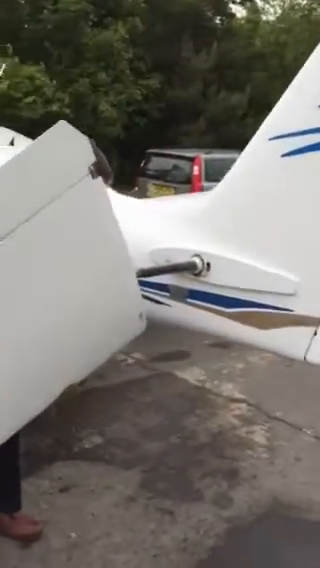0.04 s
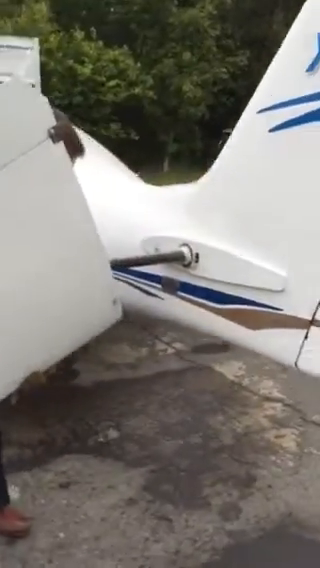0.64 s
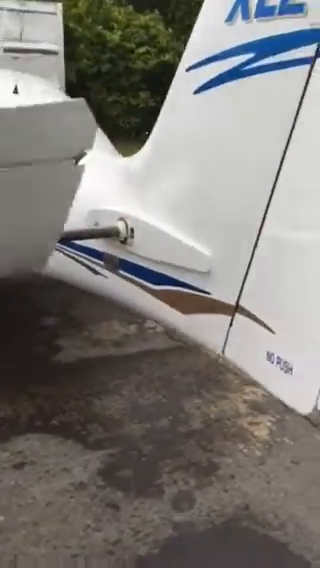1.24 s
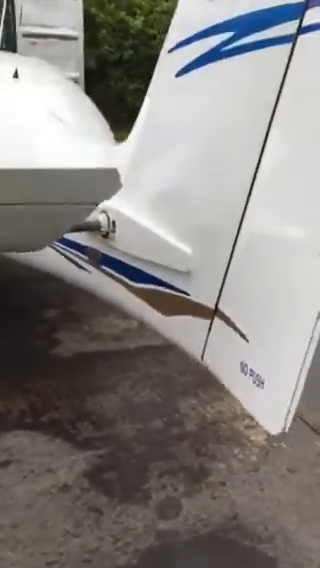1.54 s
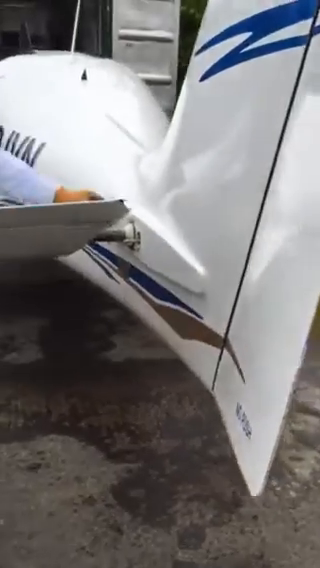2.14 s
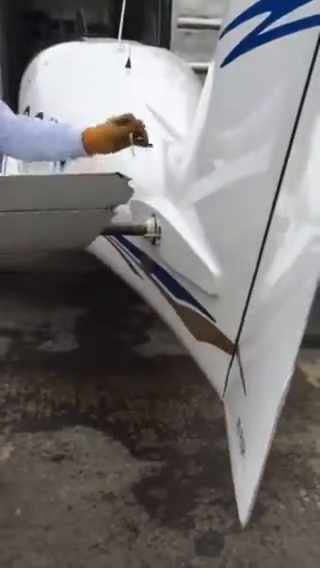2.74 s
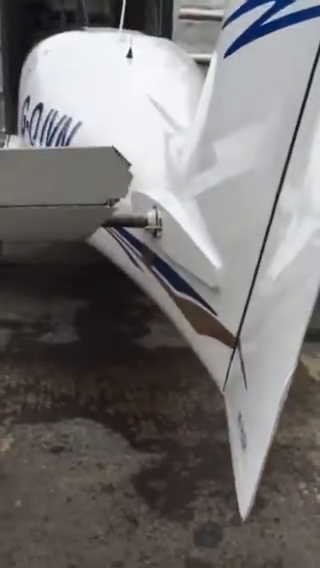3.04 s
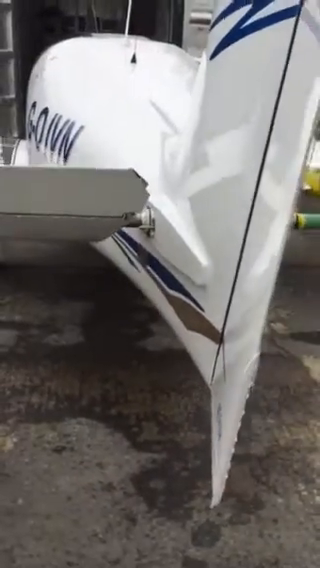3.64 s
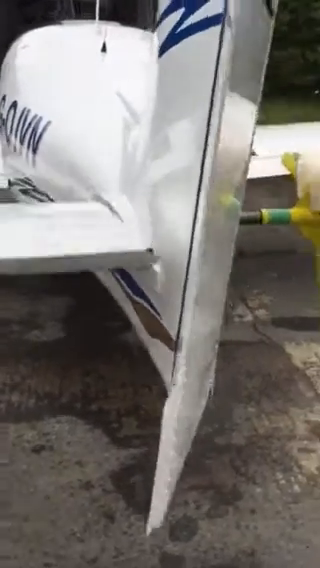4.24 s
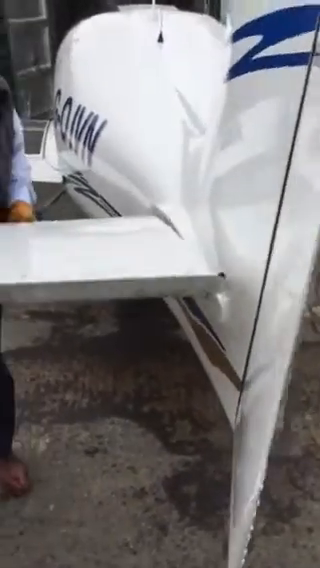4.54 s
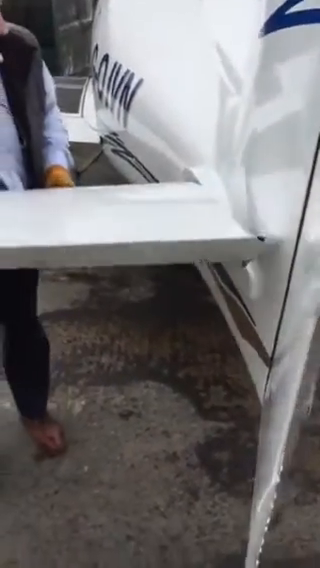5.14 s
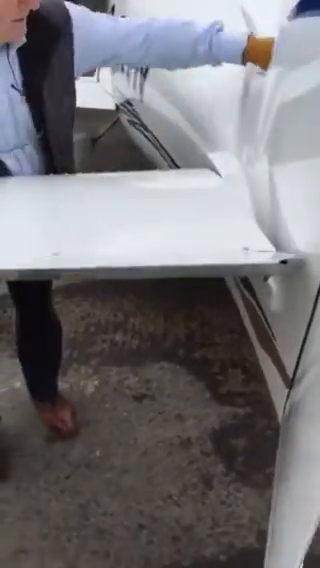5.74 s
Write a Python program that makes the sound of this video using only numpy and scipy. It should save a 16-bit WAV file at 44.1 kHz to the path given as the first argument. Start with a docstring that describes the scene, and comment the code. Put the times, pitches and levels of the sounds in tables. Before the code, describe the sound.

Outdoors, close to the microphone, a folding aircraft wing is handled with an uneven run of hollow knocks and brief clacks from its metal fittings. After the opening knocks, wind thumps softly on the microphone and a latch scrapes and snaps shut. One loud clunk follows about a second and a half later, then smaller knocks as the wing settles. Gloves and shoes scuff quietly throughout over a very still background.

```python
"""A light aircraft's hollow wing is swung back and jostled into place on a quiet, open concrete yard.
Faint squeaks lead into the first blows: the skin knocks, the air inside booms, metal fittings clack.
From 2 s puffs of wind buffet the microphone; a latch slides in jerks and snaps home near 2.7 s.
More wind and knocks lead to the hardest blow near 4.2 s, and a few lighter ones settle the wing.
Gloves and shoes scuff between the blows and on to the end."""
import sys
import numpy as np
from scipy import signal
from scipy.fft import rfft, irfft
from scipy.io import wavfile

SR = 44100
rng = np.random.default_rng(int(sys.argv[2]) if len(sys.argv) > 2 else 0)


def store_wav(level_fs):
    """Save 16-bit WAV to argv[1]."""
    pcm = np.round(np.clip(np.atleast_2d(level_fs), -1, 1) * 32767)
    wavfile.write(sys.argv[1], SR, pcm.T.astype(np.int16))


N = 264546
RING_TIME = np.arange(SR * 3 // 4) / SR  # seconds since a blow
BANDS_HZ = np.geomspace(60, 15000, 9)

# blows on the hollow wing: start_s, force_db, contact_ms, bass_db, boom_db
WING_BLOWS = [ (0.641, -18, .7, -6, 8), (0.739, -15.5, .25, -3, 0), (0.786, -15.5, .39, 1, 2),
              (0.845, -29, .9, 2, 0), (1.130, -20, .28, -3, -1.5), (1.143, -21, .4, 3, -2),
              (1.2185, -16.5, .42, -1, 1), (1.256, -28, .4, -2.5, 8), (1.545, -29, .55, 7, 18),
              (1.745, -30, 4, 0, 4.5), (2.009, -43, .8, -4, -12), (2.022, -28, 2, -9, -12.5),
              (2.620, -25, .28, -27, -32), (2.659, -24, .25, -22, -25), (3.541, -23, .6, -6.5, -8),
              (3.691, -11, .24, -13, -14), (4.094, -31, .13, -6, -8), (4.1575, -14, .25, -7, -10.5),
              (4.1625, -6, .07, -9, -14), (4.171, -.5, .13, 2, -1), (4.193, -14, .17, -1, -8.5),
              (4.641, -31, 1.1, -1, -14), (4.6855, -16.5, 1, -2, -10), (4.818, -17, .52, -15, -18),
              (4.853, -14, .12, -4, -14), (4.864, -15, .2, 0, -10), (5.214, -24, .7, 0, 16),
              (5.2215, -17.5, .29, -3, 0)]
# tone of the skin's dense ring: frequency_hz, level_db
SKIN_SPECTRUM = [(30, -21), (70, -4), (130, -0.5), (300, 0), (550, 0), (900, -3.5), (1500, -6.5),
                 (2800, -12.5), (4500, -19), (6000, -17), (9000, -28), (15000, -31)]
# length of the skin's tail: frequency_hz, t60_s
SKIN_TAIL_T60 = [(60, 1.0857), (300, 0.8), (700, 0.5475), (1500, 0.3418), (4000, 0.1764), (15000, 0.0068)]
# weight of the skin's tail: frequency_hz, level_db
SKIN_TAIL_DB = [(60, -19), (150, -14), (280, -8), (550, -21), (1500, -18.5), (4000, -20), (15000, -21)]
# the wing's strongest modes: pitch_hz, level_db, t60_s
WING_RESONANCES = [(188, -11, .55), (229, -12, .6), (266, -12, .65), (310, -5, .55), (332, -8, .5),
                   (410, -6, .35), (486, -7, .2), (515, -10, .19), (558, -5, .3), (592, -11, .3),
                   (684, 2, .17), (778, -24, .6), (886, -9, .14), (950, -3, .12), (1030, -5, .14),
                   (1150, -8, .13), (1410, -10, .13), (1680, -6, .1), (1997, -8, .1), (2648, -8, .09),
                   (2861, -10, .09), (4384, -14, .08), (5864, -10, .07)]
# metal fittings striking: start_s, force_db, pitch_hz
FITTING_HITS = [(0.740, -34, 7000), (1.143, -28, 13500), (1.162, -24, 14000), (1.171, -17, 3300),
                (2.393, -57, 11700), (2.476, -55, 8500), (2.621, -44, 11500), (2.660, -42, 11500),
                (2.715, -17, 2300), (2.7345, -3.5, 2500), (2.739, -6.5, 1650), (3.196, -44, 5000),
                (3.692, -21, 1450), (3.909, -43, 4500), (4.163, -10, 5000), (4.171, -5, 2800),
                (4.197, -18, 3000), (4.818, -44, 13000), (4.848, -24, 6500), (4.853, -17, 5600),
                (4.8545, -14, 3900), (5.226, -23, 1700)]
# tone of the fittings' dense ring: frequency_hz, level_db
FITTING_SPECTRUM = [(100, -48), (400, -20), (800, -8.5), (1200, -2), (1700, -1), (2800, -5), (4800, -14),
                    (7200, -15), (10000, -21), (15000, -24)]
# the fittings' strongest modes: pitch_hz, level_db, t60_s
FITTING_RESONANCES = [(1125, -3, .12), (1357, -4, .13), (1518, -7, .16), (1640, -4, .13), (1782, -10, .17),
                      (2860, -10, .13), (4400, -14, .1), (5900, -12, .09), (7220, -14, .08),
                      (8100, -18, .1)]
# jerks of the sliding latch: start_s, level_db
LATCH_SLIDES = [(2.619, -32.5), (2.658, -30), (2.711, -29)]
# the latch's body: pitch_hz, width_hz, level_db
LATCH_RESONANCES = [(480, 120, -7), (689, 50, -1), (807, 70, 0), (937, 70, -1), (1770, 130, -8),
                    (2730, 200, -18), (3340, 200, -18), (5700, 500, -31)]
# gloves and shoes scuffing: middle_s, level_db, half_length_s, tilt_db_per_octave
HANDLING_SCUFFS = [(0.28, -64, .05, -1), (1.08, -49, .06, -4.5), (1.40, -53.5, .04, -2),
                   (1.49, -51, .025, -1.5), (1.565, -47, .03, -1), (1.88, -54, .06, -10),
                   (2.04, -60, .06, 1), (3.12, -59.5, .11, -.5), (3.435, -50, .015, -3),
                   (3.51, -47, .035, -1.5), (3.67, -46, .015, -8), (3.82, -52.5, .06, -1.5),
                   (3.905, -43, .014, 1.5), (4.0, -50, .07, -2), (4.13, -48, .03, 0.5), (4.28, -51, .03, 1),
                   (4.66, -45, .02, -7), (4.78, -55, .04, -5), (5.195, -44.5, .025, -1),
                   (5.48, -55, .03, -5), (5.80, -65, .06, -0.5), (5.915, -49, .028, 1)]
# tone of a scuff before its tilt: frequency_hz, level_db
SCUFF_SPECTRUM = [(100, -13.5), (400, 0), (1400, 1), (3000, -7), (6000, -12.5), (10000, -19),
                  (15000, -21)]
# squeaks of rubbing parts: middle_s, level_db, half_length_s, pitch_hz
RUB_SQUEAKS = [(0.21, -71, .03, 1570), (0.27, -60, .013, 1580), (0.318, -59, .013, 1590),
               (2.729, -24, .005, 1700), (4.652, -66, .008, 5600), (5.26, -65, .005, 11700)]
# wind eddies at the microphone: middle_s, level_db, half_length_s, pitch_hz
WIND_PUFFS = [(2.085, -29, .02, 90), (2.145, -26, .028, 95), (2.195, -28.5, .018, 100),
              (2.247, -23.5, .022, 100), (2.318, -31.5, .014, 100), (2.388, -32.5, .01, 90),
              (2.46, -36.5, .025, 80), (2.79, -33, .022, 95), (3.293, -19, .008, 85),
              (3.43, -35, .025, 100), (3.592, -21, .02, 100), (3.63, -23, .02, 110),
              (3.77, -27.5, .022, 150), (3.832, -20, .012, 130), (3.972, -25.5, .012, 175),
              (5.39, -35, .014, 105), (5.472, -39.5, .01, 100), (5.555, -36.5, .014, 85)]
# tone of an eddy's flutter: frequency_hz, level_db
FLUTTER_SPECTRUM = [(20, -7.5), (60, -4.5), (250, -1), (500, -15), (1000, -44), (3000, -77)]
# gusts of breeze: start_s, length_s, relative_level_db
BREEZE_GUSTS = [(0.63, .7, -49), (1.7, .16, -41), (2.03, .39, -40), (2.77, .22, -42), (3.3, 2.28, -45.5),
                (3.55, .3, -35.5), (5.71, .29, -48.5)]
# tone of the breeze's rumble: frequency_hz, level_db
BREEZE_SPECTRUM = [(15, -31), (35, -14), (65, 0.5), (110, -2.5), (180, -9.5), (350, -26.5),
                   (900, -51.5), (3000, -76.5)]
# tone of the outdoor bed: frequency_hz, level_db
YARD_SPECTRUM = [(25, -25), (60, -5), (120, -11), (250, -15), (500, -12), (1000, -15), (1500, -15),
                 (3000, -19.5), (7000, -27), (15000, -33)]


def wing_knocks(skin_db=5.5, modes_db=-17, cavity_db=-5, boom_hz=172, bass_hz=280, medium_force_db=-18):
    """Each blow shakes the skin, which rings on faintly, and pumps the air in the hollow wing."""
    out, bands = np.zeros(N), dense_modes()
    mode_hz, modes = ring(WING_RESONANCES)
    attack = decay(t60_s=.1 * (BANDS_HZ / 1000) ** -.33)  # high modes die sooner
    tail = amp(curve(SKIN_TAIL_DB, BANDS_HZ))[:, None] * decay(curve(SKIN_TAIL_T60, BANDS_HZ))
    spreading = 1 - np.exp(-RING_TIME / .001)  # bending waves need a moment to cross the panel
    boom_swell = decay(t60_s=.13) * (1 - np.exp(-RING_TIME / .006))
    for start_s, force_db, contact_ms, bass_db, boom_db in WING_BLOWS:
        def contact_db(hz):
            """A long, soft contact cannot excite the high modes; a shelf sets the low-end weight."""
            treble_loss_db = 10 * np.log10(1 + (hz * contact_ms / 1000) ** 5)
            return bass_db / (1 + (hz / bass_hz) ** 4) - treble_loss_db

        tail_db = 1 - .35 * (force_db - medium_force_db)  # a hard blow is damped sooner
        skin = strike(bands, attack + amp(tail_db) * tail)
        skin = colour(skin, lambda hz: skin_db + curve(SKIN_SPECTRUM, hz) + contact_db(hz))
        skin += (amp(modes_db + contact_db(mode_hz)) * strike_spot(len(modes))) @ modes
        pitch_hz = boom_hz * (1 + .04 * rng.standard_normal())
        boom = amp(cavity_db + boom_db) * boom_swell * np.sin(2 * np.pi * pitch_hz * RING_TIME)
        add(out, start_s, amp(force_db) * (skin * spreading + boom))
    return out


def fitting_clacks(crack_db=3.5, modes_db=-20, peak_db=5, tail_db=-19.5):
    """Metal on metal: a short crack, a few modes and a faint tail, lifted near the part's own pitch."""
    out, bands = np.zeros(N), dense_modes()
    mode_hz, modes = ring(FITTING_RESONANCES)
    decays = decay(t60_s=.033 * (BANDS_HZ / 2000) ** -.1) + amp(tail_db) * decay(t60_s=.23)
    for start_s, force_db, pitch_hz in FITTING_HITS:
        def part_db(hz):
            """Smaller, higher parts sound brighter."""
            tilt_db_per_octave = 1.7 * np.log2(pitch_hz / 2000)
            lift_db = peak_db * resonance(hz, pitch_hz, width_hz=.22 * pitch_hz)
            return force_db + tilt_db_per_octave * np.log2(hz / 2000) + lift_db

        crack = strike(bands, decays[:, :SR // 3])
        crack = colour(crack, lambda hz: crack_db + curve(FITTING_SPECTRUM, hz) + part_db(hz))
        add(out, start_s, crack)
        add(out, start_s, (amp(modes_db + part_db(mode_hz)) * strike_spot(len(modes))) @ modes)
    return out


def latch_slide(grain_db=4, rise_s=.003, home_s=2.736, low_cut_hz=350):
    """Stick and slip shakes the latch as it slides in jerks, stopping once it is home."""
    def body_db(hz):
        """The latch's resonances, with the lows rolled off."""
        power = sum((amp(level_db) * resonance(hz, pitch_hz, width_hz)) ** 2
                    for pitch_hz, width_hz, level_db in LATCH_RESONANCES)
        return 10 * np.log10(power / (1 + (low_cut_hz / hz) ** 4))

    slips = rng.standard_normal(N) * amp(grain_db * wander(N, per_s=500))
    jerks = sum(amp(level_db) * envelope(start_s, rise_s, rise_s, fall_s=.035)
                for start_s, level_db in LATCH_SLIDES)
    return unit_rms(colour(slips, body_db)) * jerks * envelope(0, home_s, rise_s, fall_s=.004)


def scuff(level_db, half_length_s, tilt_db_per_octave, grain_db=2.6, ripple_db=3.4):
    """A glove or shoe slides: a swell of tiny slips, coloured by the rubbed spot's resonances."""
    t = np.arange(-SR // 3, SR // 3) / SR
    slips = rng.standard_normal(len(t)) * amp(grain_db * wander(len(t), per_s=120))
    ripple_hz = np.geomspace(300, 16000, 110)
    ripple = np.c_[ripple_hz, ripple_db * rng.standard_normal(len(ripple_hz))]
    tilt_db = lambda hz: tilt_db_per_octave * np.log2(np.maximum(hz / 500, 1))
    hiss = colour(slips, lambda hz: curve(SCUFF_SPECTRUM, hz) + curve(ripple, hz) + tilt_db(hz))
    return amp(level_db) * unit_rms(hiss) / np.cosh(1.2 * t / half_length_s)


def squeak(level_db, half_length_s, pitch_hz, waver=.04, octave_db=-16):
    """Rubbing parts slip fast and regularly: a wavering tone with a weak octave."""
    t = np.arange(-SR // 10, SR // 10) / SR
    phase = 2 * np.pi * np.cumsum(pitch_hz * (1 + waver * wander(len(t), per_s=300))) / SR
    tone = unit_rms(np.sin(phase) + amp(octave_db) * np.sin(2 * phase))
    return amp(level_db) * tone * np.exp(-(t / half_length_s) ** 2 / 2)


def wind_puff(level_db, half_length_s, pitch_hz, waver=.32, flutter_db=-11):
    """An eddy passes the microphone: a few uneven swings of pressure, fluttering at its height."""
    t = np.arange(-SR // 10, SR // 10) / SR
    cycles = np.cumsum(pitch_hz * np.exp(waver * wander(len(t), per_s=170))) / SR + rng.random()
    pressure = unit_rms(np.sin(2 * np.pi * cycles))
    flutter = amp(flutter_db) * shaped_noise(len(t), FLUTTER_SPECTRUM)
    swell = np.exp(-(t / half_length_s) ** 2 / 2)
    return amp(level_db) * swell * (pressure + swell * flutter)


def breeze(trim_db=-3, lumpy_db=4.2, calm_db=-75):
    """Moving air rumbles in lumpy gusts that build quickly and die away to near stillness."""
    rumble = shaped_noise(N, BREEZE_SPECTRUM)
    gusts = [amp(level_db) * envelope(start_s, length_s, rise_s=.04, fall_s=.05)
             for start_s, length_s, level_db in BREEZE_GUSTS]
    lumps = amp(trim_db + lumpy_db * wander(N, per_s=22))
    return rumble * (amp(calm_db) + np.max(gusts, axis=0)) * lumps


def yard_air(level_db=-68.5):
    """A very quiet, steady bed of outdoor noise."""
    return amp(level_db) * shaped_noise(N, YARD_SPECTRUM)


def dense_modes():
    """Countless overlapping modes: noise split into bands that can die at their own speeds."""
    spectrum, hz = rfft(rng.standard_normal(2 * SR)), np.fft.rfftfreq(2 * SR, 1 / SR)
    weights = [np.interp(np.log(hz + 1), np.log(BANDS_HZ), row) for row in np.eye(len(BANDS_HZ))]
    return irfft(spectrum * np.array(weights))


def strike(bands, decays):
    """Each blow sets off a different mixture of the dense modes."""
    offset = rng.integers(SR)
    return np.sum(bands[:, offset:offset + decays.shape[1]] * decays, axis=0)


def strike_spot(count, spread_db=1.5):
    """Sign and strength of each mode at the spot where a blow lands."""
    polarity, strength = rng.standard_normal((2, count))
    return np.sign(polarity) * amp(spread_db * strength)


def ring(modes):
    """The pitches of the modes and their damped sines."""
    pitch_hz, level_db, t60_s = np.transpose(modes)
    sines = np.sin(2 * np.pi * pitch_hz[:, None] * RING_TIME)
    return pitch_hz, amp(level_db)[:, None] * decay(t60_s) * sines


def decay(t60_s):
    """One curve for each t60_s, falling 60 dB in that time."""
    return np.exp(-np.log(1000) * RING_TIME / np.asarray(t60_s)[..., None])


def envelope(start_s, length_s, rise_s, fall_s):
    """A straight rise, a hold until length_s after the start, and an exponential release."""
    t = np.arange(N) / SR - start_s
    return np.clip(t / rise_s, 0, 1) * np.exp(-np.maximum(t - length_s, 0) / fall_s)


def resonance(hz, centre_hz, width_hz):
    """Gain of one resonance, 1 at its centre."""
    return 1 / np.sqrt(1 + (2 * (hz - centre_hz) / width_hz) ** 2)


def wander(count, per_s):
    """Smooth random drift of about rms 1 that changes per_s times a second."""
    knots = rng.standard_normal(4096)
    whole, part = np.divmod(np.arange(count) * per_s / SR, 1)
    at = whole.astype(int)
    return knots[at] + (knots[at + 1] - knots[at]) * part ** 2 * (3 - 2 * part)


def shaped_noise(count, spectrum):
    """Noise of rms 1 with the given tone."""
    return unit_rms(colour(rng.standard_normal(count), lambda hz: curve(spectrum, hz)))


def colour(sound, db_at, size=4096):
    """Minimum-phase EQ whose gain in dB is db_at(hz)."""
    gain_db = np.maximum(db_at(np.fft.rfftfreq(size, 1 / SR) + 1), -100)
    cepstrum = irfft(np.log(amp(gain_db)))
    cepstrum[1:size // 2] *= 2  # folded forward, so nothing rings ahead of a hit
    cepstrum[size // 2 + 1:] = 0
    impulse_response = irfft(np.exp(rfft(cepstrum)))
    return signal.fftconvolve(sound, impulse_response)[:len(sound)]


def curve(points, hz):
    """Joins points by straight lines on a log-frequency axis."""
    point_hz, value = np.transpose(points)
    return np.interp(np.log(hz + 1), np.log(point_hz + 1), value)


def amp(db):
    """Decibels to gain."""
    return 10 ** (np.asarray(db) / 20)


def unit_rms(sound):
    """Scales to rms 1."""
    return sound / np.sqrt(np.mean(sound ** 2) + 1e-20)


def add(mix, start_s, sound):
    """Lays a sound into the mix, trimming any overhang."""
    start = round(start_s * SR)
    sound = sound[max(-start, 0):]
    part = mix[max(start, 0):][:len(sound)]
    part += sound[:len(part)]


def scene():
    """The open yard in mono, with the wind and the handling laid over it."""
    mix = yard_air() + breeze() + wing_knocks() + fitting_clacks() + latch_slide()
    for source, cues in (scuff, HANDLING_SCUFFS), (squeak, RUB_SQUEAKS), (wind_puff, WIND_PUFFS):
        for middle_s, *settings in cues:
            sound = source(*settings)
            add(mix, middle_s - len(sound) / 2 / SR, sound)
    return mix[None]


def record(dry, ceiling=.75, cutoff_hz=15500):
    """A soft clip rounds the hardest peaks, then a steep low-pass trims the top."""
    rounded = dry / (1 + (dry / ceiling) ** 4) ** .25
    low_pass = signal.firwin(255, cutoff_hz, window=("kaiser", 9), fs=SR)
    return signal.oaconvolve(rounded, low_pass[None], "same")


dry = scene()
out = record(dry)
store_wav(out)
```